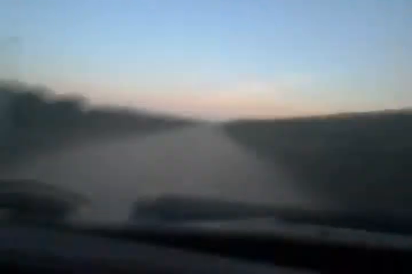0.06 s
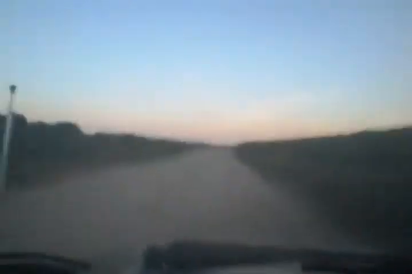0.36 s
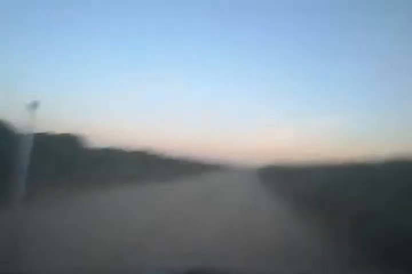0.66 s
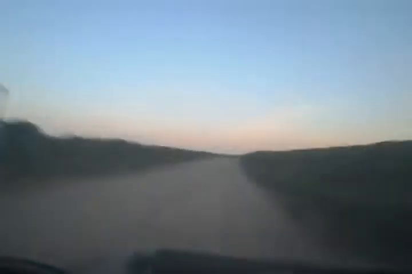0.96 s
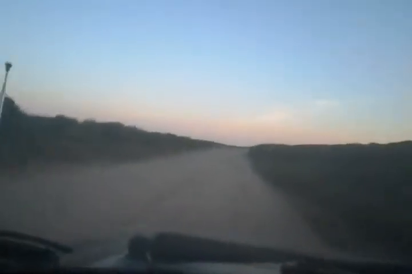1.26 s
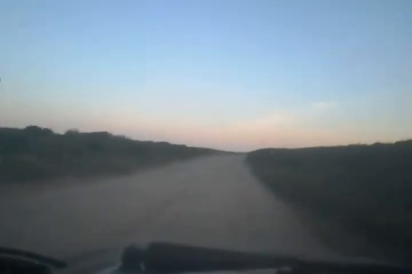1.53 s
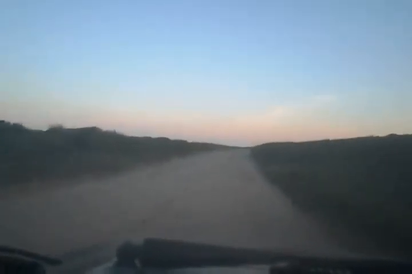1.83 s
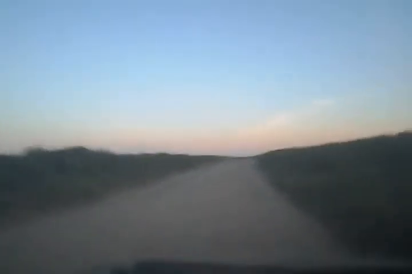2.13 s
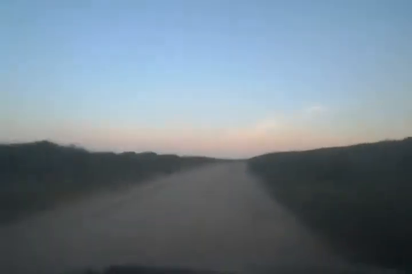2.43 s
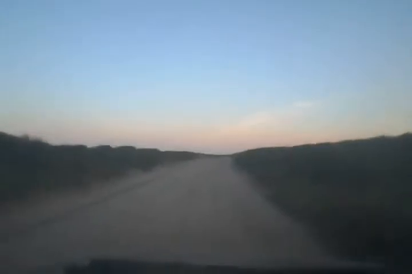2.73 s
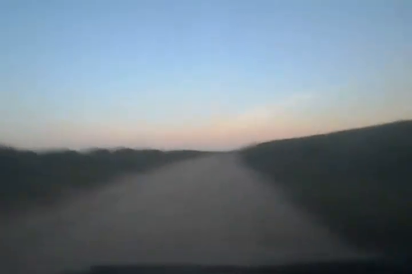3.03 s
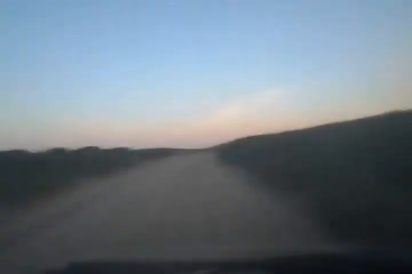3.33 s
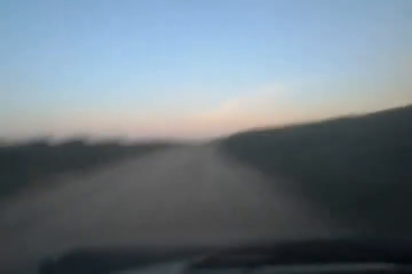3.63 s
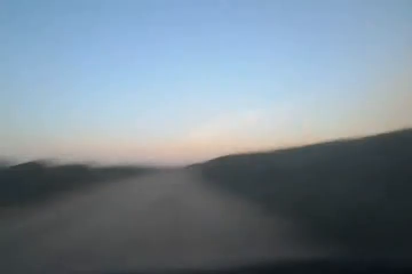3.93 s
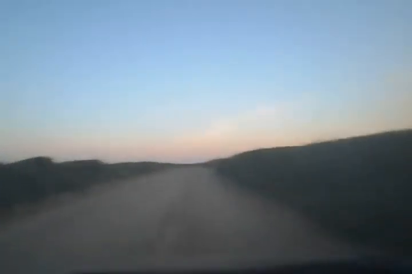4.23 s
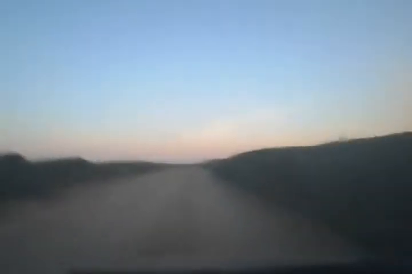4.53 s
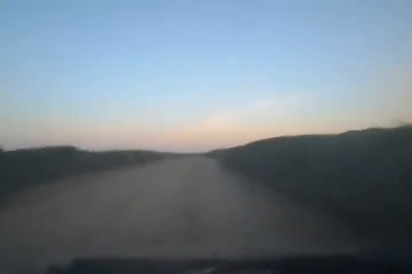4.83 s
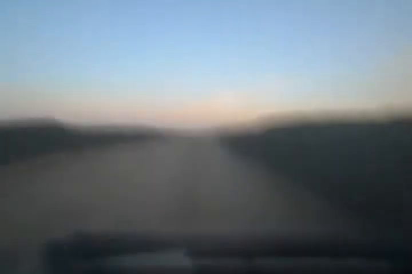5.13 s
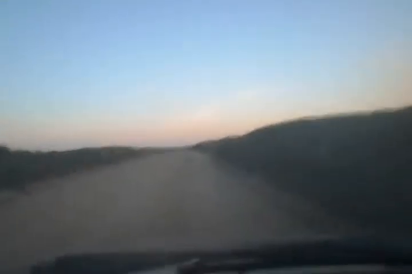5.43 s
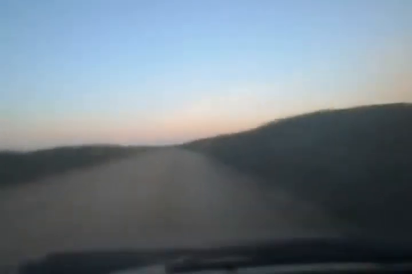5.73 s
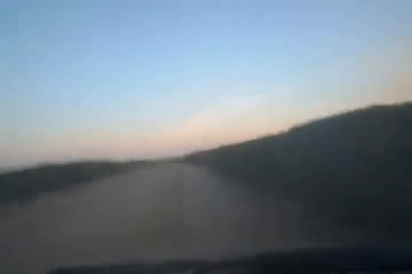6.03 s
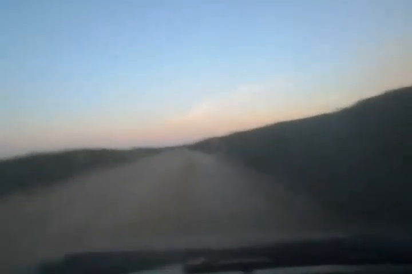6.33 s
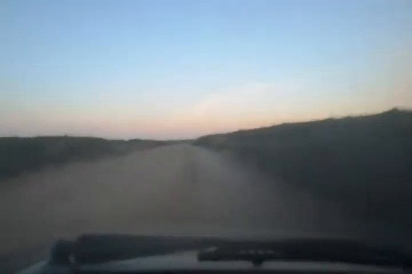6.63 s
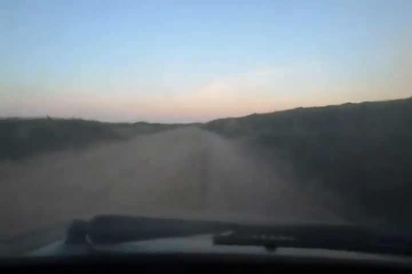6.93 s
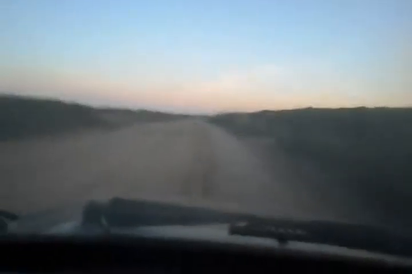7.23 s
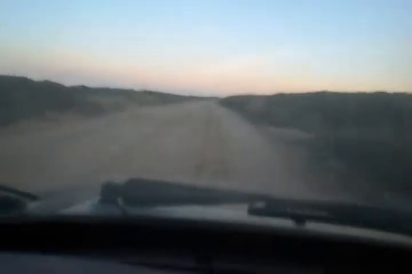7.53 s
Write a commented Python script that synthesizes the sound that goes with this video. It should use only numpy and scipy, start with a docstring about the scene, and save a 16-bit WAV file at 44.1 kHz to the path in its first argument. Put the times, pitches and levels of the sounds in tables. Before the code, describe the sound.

A car rumbles over a rough dirt road, heard from inside, with jolts, clattering trim and sand hissing under the wheels.

```python
"""A low rumble and a hiss of sand come first: we are inside a car gathering speed on a rough track.
The body heaves over the ruts, the floor drums and the tyres roar on the ground.
Patches of loose sand and gravel spray the wheel arches while small parts tick and jingle.
Jolts thump the suspension and make loose trim and panels click, clatter and squeak.
Through it all the engine's firings boom in the cabin, slowly rising in pitch."""
import sys
import numpy as np
from scipy import signal
from scipy.fft import rfft, irfft
from scipy.io import wavfile
from scipy.ndimage import uniform_filter1d, minimum_filter1d

SR = 44100
rng = np.random.default_rng(int(sys.argv[2]) if len(sys.argv) > 2 else 0)


def transcribe(signal):
    """Save signal, clipped to [-1, 1], as a 16-bit WAV file at the path in sys.argv[1]."""
    frames = np.atleast_2d(signal).T
    limited = np.clip(frames, -1, 1)
    pcm = np.round(limited * 32767).astype(np.int16)
    wavfile.write(sys.argv[1], SR, pcm)


N = 334704
T = np.arange(N) / SR

# how rough the track is: (time [s], roughness [dB])
ROUGHNESS = [(0.0, -47), (0.21, -45), (0.55, -37), (0.78, -44.5), (1.08, -49.5), (2.51, -42.5), (2.96, -44),
             (3.3, -50.5), (3.63, -43), (4.33, -48.5), (5.3, -42.5), (5.41, -43), (5.56, -42),
             (5.81, -47.5), (6.64, -43), (6.98, -46.5), (7.36, -44), (7.59, -40)]
# dips that swing the body and load the wheels: (time of deepest point [s], heave [dB], drumming [dB])
TRACK_DIPS = [(.37, -16.5, -33.5), (.68, -13.5, -36.5), (1.229, -19.5, -56), (1.38, -17, -38.5),
              (2.151, -18.5, -38.5), (2.522, -15, -34.5), (2.792, -15.5, -40), (3.05, -19, -29.5),
              (3.204, -13, -30.5), (3.559, -12, -32.5), (3.969, -15, -49), (5.341, -11, -37.5),
              (5.862, -20.5, -34.5), (6.052, -15.5, -32), (6.23, -14.5, -33.5), (6.529, -11.5, -31),
              (6.76, -11, -29), (7.38, -19.5, -31.5)]
# the tone colour of each noise: (frequency [Hz], relative level [dB])
HEAVE_SPECTRUM = [(8, -22), (15, -5), (24, 0), (34, -2.5), (46, -6.5), (62, -13), (85, -24), (130, -40)]
FLOOR_SPECTRUM = [(45, -5), (80, 2), (105, -1), (125, -3.5), (148, -5), (175, -8.5), (212, -8),
                  (245, -17.5), (320, -19), (600, -61.5)]
TYRE_SPECTRUM = [(120, -18.5), (230, -7), (280, 5.5), (340, 2.5), (430, 0.5), (540, -0.5), (680, -4),
                 (850, -8.5), (1100, -13), (1400, -17), (2200, -40), (3500, -75)]
GRAVEL_SPECTRUM = [(600, -12.5), (1100, 8.5), (1600, 13), (2300, 13.5), (2800, 5), (3400, -31.5),
                   (4500, -45)]
SAND_SPECTRUM = [(1500, -20), (3000, 7.5), (4200, 6.5), (5200, 5), (6700, 4.5), (8000, 9), (9200, 9.5),
                 (9800, 7), (10500, -9.5)]
CRUNCH_SPECTRUM = [(200, -1.5), (350, 9), (550, -2), (850, -3), (1300, -19), (2300, -25.5), (3500, -50)]
# trim rubbing: (time [s], length [s], pitch [Hz], level [dB])
TRIM_RUBS = [(2.145, 0.021, 1320, -56), (5.326, 0.031, 4060, -52), (5.428, 0.025, 1596, -42),
             (5.495, 0.018, 1620, -42.5)]
# the notes hard trim rings with: (pitch [Hz], relative level [dB], time to peak [s])
TRIM_NOTES = [(1550, -5, .0005), (2200, -1, .0004), (3250, 0, .00065), (4330, -1.5, .0006),
              (5400, -7, .0004), (6720, 0, .00058), (7280, -3, .00062), (8750, -2, .00058),
              (9380, -1, .00052)]
# loose trim tapping: (time [s], level [dB], boost of low notes [dB], boost of middle notes [dB])
TRIM_TAPS = [(.031, -48, -4, 2), (.099, -47, -12, 2), (0.128, -52, -9, 3), (.183, -45, -23, -19),
             (0.4287, -30.5, -17, -4), (0.4898, -21.5, -22, -5), (0.4942, -24.5, -9, -4.5),
             (.507, -38.5, -0.5, -1), (0.531, -36, -20, -17), (0.7876, -53, -1, -3),
             (0.8174, -38.5, -4, -3), (0.825, -48, 1, 1), (.966, -62, -7, 3), (1.0675, -34, -4, -2),
             (1.152, -58, 0, 2), (1.5534, -35.5, -18.5, -6.5), (1.561, -55, -3, 5), (3.0, -50, -6, -12),
             (3.276, -38, -8, 0.5), (3.287, -42, -6, 3), (3.436, -54, 4, 11), (3.5302, -30.5, -15, 4.5),
             (3.6232, -52, 0, -7), (3.661, -22.5, -9.5, -5.5), (4.1538, -43.5, -5, 0),
             (4.221, -57, -1.5, 1), (4.2268, -41.5, -14, -12), (4.675, -48, -11, 2.5),
             (4.7003, -55, -10, 2), (4.901, -59, 0.5, 1.5), (5.262, -38, -4, -7), (5.338, -41, 6.5, -6),
             (5.365, -50, -7, -1), (5.4036, -24.5, -16, -2), (5.4067, -25.5, -10.5, -4),
             (5.432, -43.5, 2, -2), (5.4922, -41, -4, 7.5), (5.514, -31, -13, -9), (6.947, -47.5, -9, 0),
             (7.482, -59, -6, -7), (7.543, -48, -10, -4)]
# the notes of small metal parts: (pitch [Hz], relative level [dB], time to fade by 60 dB [s])
METAL_NOTES = [(2400, -5, .04), (3280, -2, .05), (3420, -4, .05), (4090, -5, .05), (4380, -3, .05),
               (4570, -4, .05), (5300, -5, .05), (5850, -5, .05), (6800, 0, .035), (7500, 0, .04),
               (8400, -1, .04), (8800, 1, .04), (9400, 1, .04)]
# loose ground thrown at the body: (start [s], length [s], gravel flow [dB], sand flow [dB])
LOOSE_PATCHES = [(0, 0.13, -61, -56.5), (0.188, 0.16, -57, -76.5), (0.37, 0.033, -51, -51.5),
                 (0.416, 0.013, -43.5, -41), (0.44, .1, -47.5, -48), (0.604, 0.036, -48.5, -53.5),
                 (0.66, 0.027, -46, -48.5), (0.713, 0.055, -57, -57), (0.784, 0.068, -57.5, -52.5),
                 (0.875, 0.03, -62, -67), (0.979, 0.1, -63, -56.5), (1.107, 0.083, -63, -59),
                 (1.29, 0.096, -57.5, -52.5), (1.397, 0.027, -64, -93), (1.523, 0.051, -66, -60.5),
                 (1.667, 0.035, -63, -85), (1.837, 0.082, -69.5, -99), (2.51, 0.036, -61.5, -94),
                 (2.693, 0.038, -59, -74.5), (2.914, 0.19, -58, -66), (3.139, 0.16, -59.5, -61),
                 (3.266, 0.29, -61, -60.5), (3.497, 0.24, -54.5, -53), (3.768, 0.19, -62.5, -80),
                 (4.106, 0.18, -59, -59), (4.508, 0.093, -63.5, -61.5), (4.644, 0.052, -65, -60.5),
                 (4.732, 0.12, -64.5, -80), (4.865, 0.075, -59.5, -60), (4.975, 0.24, -63, -84.5),
                 (5.204, 0.1, -56.5, -56), (5.248, 0.31, -50, -50.5), (5.794, 0.053, -63.5, -91),
                 (5.938, 0.047, -63, -65), (6.076, 0.051, -64.5, -95), (6.288, 0.068, -62, -72.5),
                 (6.413, 0.065, -62, -72), (6.522, 0.12, -55, -74), (6.683, 0.087, -59.5, -96.5),
                 (6.774, 0.07, -53, -61.5), (6.888, 0.11, -61, -64.5), (7.107, 0.065, -63, -73.5),
                 (7.203, 0.088, -65, -72), (7.378, 0.11, -57, -58.5), (7.534, 0.071, -56, -52.5)]
# the bands the panels ring in: (centre [Hz], width [Hz], relative level [dB])
PANEL_BANDS = [(420, 300, -3), (830, 340, 0), (1280, 450, -2), (1750, 550, -7), (2400, 800, -10)]
# loose panels clattering: (time [s], length [s], level [dB], brightness [dB per octave])
PANEL_CLATTERS = [(.398, 0.013, -45, 0), (0.413, 0.0057, -30, -4), (0.421, .014, -43, -4),
                  (.48, 0.037, -50, 0), (.603, .012, -46, 4), (0.668, .009, -37.5, 0.5),
                  (1.325, 0.043, -57, 0), (2.544, .007, -49.5, -6), (2.708, .007, -49, -1),
                  (3.199, 0.014, -45.5, 0.5), (3.218, 0.019, -51, -1), (3.35, 0.013, -51, 0),
                  (3.591, 0.01, -47, -2), (5.174, .007, -52, -2), (5.327, 0.02, -46.5, 5),
                  (6.763, .02, -49, -7), (7.56, 0.034, -49.5, 3)]
# the notes the floor rings with: (pitch [multiple of the thud pitch], relative level [dB])
FLOOR_NOTES = [(.76, -3.5), (1, 3), (1.17, -11), (1.62, -13.5)]
# jolts of the suspension: (time [s], thud peak [dB], thud pitch [Hz], crunch peak [dB])
WHEEL_JOLTS = [(0.393, -26, 146, -24.5), (.414, -24, 275, -24.5), (0.487, -23, 160.5, -37),
               (0.596, -32, 202, -34), (0.638, -21, 216, -46), (0.664, -30, 222, -37),
               (1.331, -25, 203, -37), (1.426, -30.5, 211, -34.5), (2.543, -25.5, 159.6, -38.5),
               (2.708, -28.5, 175.5, -36.5), (3.001, -37, 186, -36.5), (3.196, -26, 650, -48),
               (3.214, -27.5, 182, -36), (3.349, -58, 202, -37.5), (3.659, -35, 163, -38.5),
               (3.93, -24, 199, -47), (4.029, -26, 198, -46), (4.067, -32.5, 220, -40),
               (4.153, -28.5, 204, -35.5), (4.751, -28, 190, -39.5), (5.174, -33, 153, -41),
               (5.208, -18.5, 116, -40), (5.248, -18.5, 148, -29.5), (5.28, -16.5, 104.3, -32),
               (5.323, -25, 181, -21), (5.423, -49, 207, -29), (6.761, -26.5, 142, -35.5),
               (7.557, -27, 200, -29)]
# engine speed: (time [s], firing rate [Hz])
ENGINE_SPEED = [(0, 48), (1.4, 50.7), (2, 53.3), (2.6, 55.6), (3.2, 58.6), (4, 61.3), (4.6, 64),
                (5.2, 66.3), (6, 69), (7.59, 71.5)]
# how hard the engine works: (time [s], level [dB])
ENGINE_LOAD = [(0, -36.5), (.6, -18), (.9, -34.5), (1.2, -36.5), (1.45, -23.5), (1.8, -22), (2.1, -16),
               (2.55, -17), (3, -27), (3.9, -25.5), (4.4, -27), (4.8, -24), (5.15, -21.5), (5.8, -26),
               (6.5, -25.5), (6.95, -31), (7.4, -27), (7.59, -28)]
# the tones of the cabin boom: (pitch [multiple of the firing rate], relative level at peak load [dB])
BOOM_TONES = [(1, 0), (2, -18), (3, -26)]
# where the wall between engine and cabin rings: (centre [Hz], filter width [Hz], relative level [dB])
WALL_BANDS = [(428.8, 70, 8), (530, 39, -1), (671, 84, -2.5)]


def undb(db):
    """Turn decibels into a gain."""
    return 10 ** (np.asarray(db) / 20)


def unit(x):
    """Scale x to an average (rms) level of 1."""
    return x / np.sqrt(np.mean(x ** 2))


def curve(table):
    """Join (time, value) points with straight lines, one value per sample."""
    return np.interp(T, *np.transpose(table))


def colour(x, spectrum):
    """Give x the tone colour of a spectrum table, at an average level of 1."""
    hz, db = np.transpose(spectrum)
    f = np.maximum(np.fft.rfftfreq(N, 1 / SR), 1)
    gain = undb(np.interp(np.log(f), np.log(hz), db))
    roll_off = np.minimum(f / hz[0], 1) ** 2 * np.minimum(hz[-1] / f, 1) ** 2
    return unit(irfft(rfft(x) * gain * roll_off, N))


def resonate(x, hz, width_hz):
    """Let x ring in one band of pitch."""
    return signal.lfilter(*signal.iirpeak(hz, hz / width_hz, fs=SR), x)


def wander(turns_per_s):
    """A random drift around zero, about 1 in size."""
    step = int(SR / turns_per_s)
    stairs = np.repeat(rng.standard_normal(N // step + 1), step)
    return unit(uniform_filter1d(stairs, step)[:N])


def steady_noise(spectrum, window_s):
    """Coloured noise with swells slower than the window evened out."""
    noise = colour(rng.standard_normal(N), spectrum)
    return noise / np.sqrt(uniform_filter1d(noise ** 2, int(window_s * SR)) + 1e-9)


def grains(per_s, spread_db):
    """Random impacts, many small and a few large."""
    out, count = np.zeros(N), int(per_s * N / SR)
    place, size, sign = rng.random((count, 3)).T
    size_db = spread_db * np.minimum(-np.log1p(-size), 5)
    out[(place * N).astype(int)] = undb(size_db) * np.sign(sign - .5)
    return out


def add(out, start_s, x):
    """Mix x into out from start_s on."""
    i = max(int(start_s * SR), 0)
    out[i:i + len(x)] += x[:max(N - i, 0)]


def rougher_db(usual_db=-46):
    """How much rougher than usual the track is at each moment."""
    return curve(ROUGHNESS) - usual_db


def dips(width_s=.063, lead_s=.2):
    """Each dip in the track gives one smooth swell of heave and of drumming."""
    heave, drum = np.zeros(N), np.zeros(N)
    swell = np.exp(-((T[:int(2 * lead_s * SR)] - lead_s) / width_s) ** 2)
    for s, heave_db, drum_db in TRACK_DIPS:
        add(heave, s - lead_s, undb(heave_db) * swell)
        add(drum, s - lead_s, undb(drum_db) * swell)
    return heave, drum


def ride(gravel_flow, heave_db=-21.5, drum_db=-35, roar_db=-48.5):
    """Uneven ground heaves the body and drums the floor; the tyres roar over countless small stones."""
    rough_db = rougher_db() + .9 * wander(10)
    swings, loads = dips()
    # the shares from rough track, loose gravel and dips add up as powers
    heave_gain = np.hypot(undb(heave_db + .68 * rough_db), swings)
    drum_gain = np.linalg.norm([undb(drum_db + rough_db), undb(16) * gravel_flow, loads], axis=0)
    roar_shares = [undb(roar_db + rough_db), undb(5) * gravel_flow, undb(-13) * loads]
    heave = steady_noise(HEAVE_SPECTRUM, window_s=.2) * heave_gain
    drum = steady_noise(FLOOR_SPECTRUM, window_s=.097) * drum_gain
    roar = colour(grains(5000, spread_db=3), TYRE_SPECTRUM) * np.linalg.norm(roar_shares, axis=0)
    return heave + drum + roar


def squeaks(wobble=.03, rough_db=3):
    """The flexing body drags one panel over another: a short, rough chirp."""
    out = np.zeros(N)
    for s, length, hz, db in TRIM_RUBS:
        n = int(length * SR)
        phase = 2 * np.pi * np.cumsum(hz * (1 + wobble * wander(900)[:n])) / SR
        loudness = np.hanning(n) ** .5 * undb(rough_db * wander(370)[:n])
        add(out, s, unit(np.sin(phase) * loudness) * undb(db))
    return out


def trim_ring(low_db, middle_db, crack_db=-24, pitch=1):
    """One tap on trim: a faint crack and a tiny ring; where it is struck decides which notes answer."""
    t = T[:SR // 50]
    hz, note_db, rise_s = np.transpose(TRIM_NOTES)[:, :, None]
    detune, size_db, phase = rng.standard_normal((3, len(TRIM_NOTES), 1))
    boost_db = np.interp(hz, [4600, 6300, 7700, 8200], [low_db, middle_db, middle_db, 0])
    swell = (t / rise_s * np.exp(1 - t / rise_s)) ** 2
    waves = np.sin(2 * np.pi * (pitch * hz * (1 + .008 * detune) * t + phase))
    crack = undb(crack_db) * swell[0] * rng.standard_normal(len(t))
    return np.sum(undb(note_db + boost_db + size_db) * swell * waves, 0) + crack


def clicks(echo_db=-29, echo_fade_s=.21):
    """Hard trim taps against its seat; a faint echo from the cabin follows each tap."""
    out, t = np.zeros(N), T[:SR // 10]
    for s, db, low_db, middle_db in TRIM_TAPS:
        ring = trim_ring(low_db, middle_db)
        cabin = rng.standard_normal(len(t)) * undb(-60 * t / echo_fade_s)
        echo = signal.fftconvolve(ring, cabin)
        add(out, s, undb(db) * ring)
        add(out, s, undb(db + echo_db) * echo * abs(ring).max() / abs(echo).max())
    return out


def chatter(parts=8, taps_per_s=22, pitch_spread=.05):
    """Small loose parts tick drily, each in its own time and at its own pitch."""
    pitches = 1 + pitch_spread * np.linspace(-1, 1, parts)
    rings = [trim_ring(low_db=-1, middle_db=-1, pitch=pitch) for pitch in pitches]
    return unit(sum(signal.oaconvolve(grains(taps_per_s, spread_db=.86), ring)[:N] for ring in rings))


def jingle(taps_per_s=170, pitch_spread=.035, spread_db=2):
    """Small metal parts are shaken at random; each tap rings one briefly, a little off its usual pitch."""
    out, t = np.zeros(N), T[:SR // 10]
    onset = 1 - np.exp(-t / .0006)
    for when, part, detune, size in rng.random((int(taps_per_s * N / SR), 4)):
        hz, db, fade_s = METAL_NOTES[int(part * len(METAL_NOTES))]
        hz *= 1 + pitch_spread * (2 * detune - 1)
        db += spread_db * min(-np.log1p(-size), 4)
        ring = np.sin(2 * np.pi * hz * t) * onset * undb(-60 * t / fade_s)
        add(out, when * N / SR, undb(db) * ring)
    return unit(out)


def patches(rise_s=.035, fade_s=.11):
    """The flow of gravel and of sand builds under the wheel, holds while a patch lasts and dies away."""
    gravel_power, sand_power, t = np.zeros(N), np.zeros(N), T[:SR * 3 // 4]
    rise = np.minimum(t / rise_s, 1) ** 2
    for s, length, gravel_db, sand_db in LOOSE_PATCHES:
        shape = rise * undb(-60 * np.maximum(t - rise_s - length, 0) / fade_s)
        add(gravel_power, s - rise_s, (undb(gravel_db) * shape) ** 2)
        add(sand_power, s - rise_s, (undb(sand_db) * shape) ** 2)
    return np.sqrt(gravel_power), np.sqrt(sand_power)


def spray(gravel_flow, sand_flow, patter_db=1.7, patter_per_s=110, hiss_onset_db=-58):
    """Gravel and sand patter unevenly on the wheel arches; the same shaking rattles small parts."""
    # a few stray stones fly even between the loose patches
    strays = undb(-84 + .37 * rougher_db() + 3 * wander(3))
    stones, dust = grains(2500, spread_db=2), grains(7000, spread_db=2.2)
    gravel = colour(stones, GRAVEL_SPECTRUM) * undb(-3.5 + patter_db * wander(patter_per_s))
    sand = colour(dust, SAND_SPECTRUM) * undb(-3 + patter_db * wander(patter_per_s))
    # a weak flow mostly jingles; ticks and hiss take over as it grows
    strength = sand_flow / np.hypot(sand_flow, undb(hiss_onset_db))
    hiss_and_ticks = strength * (strength * sand + chatter() * undb(-4))
    jingling = np.sqrt(1 - strength ** 2) * jingle() * undb(-3)
    return gravel * np.hypot(gravel_flow, strays) + (hiss_and_ticks + jingling) * sand_flow


def clatters(knock_count=16, gap_s=.0035, scatter_db=2):
    """Loose panels knock in a quick, uneven run; a softer contact sounds duller."""
    out, n = np.zeros(N), SR // 10
    bands = [signal.butter(3, [hz - width / 2, hz + width / 2], "bandpass", fs=SR, output="sos")
             for hz, width, _ in PANEL_BANDS]
    for s, length, db, bright_db in PANEL_CLATTERS:
        delay, size, sign = rng.random((3, knock_count))
        times = (np.arange(knock_count) + .9 * delay) * gap_s
        force = undb(scatter_db * (2 * size - 1)) * np.exp(-(times / length) ** 4)
        knocks = np.zeros(n)
        knocks[(times * SR).astype(int)] = np.sign(sign - .5) * force
        ring = sum(undb(band_db + bright_db * np.log2(hz)) * unit(signal.sosfilt(band, knocks))
                   for band, (hz, _, band_db) in zip(bands, PANEL_BANDS))
        add(out, s, undb(db) * unit(ring) * np.sqrt(length * SR / n))
    return out


def jolts(thud_fade_cycles=20, crunch_fade_s=.14):
    """A wheel meets a rut: the floor thuds briefly and the panels crunch against each other."""
    out, t = np.zeros(N), T[:SR // 4]
    onset = 1 - np.exp(-t / .003)
    grit = steady_noise(CRUNCH_SPECTRUM, window_s=.008)
    for s, thud_db, hz, crunch_db in WHEEL_JOLTS:
        phases = 2 * np.pi * rng.random(len(FLOOR_NOTES))
        ring = sum(undb(db) * np.sin(2 * np.pi * multiple * hz * t + phase)
                   for (multiple, db), phase in zip(FLOOR_NOTES, phases))
        thud = ring * onset * undb(-60 * t * hz / thud_fade_cycles)
        crunch = np.roll(grit, -int(s * SR))[:len(t)] * onset * undb(-60 * t / crunch_fade_s)
        add(out, s, undb(thud_db) * thud / abs(thud).max())
        add(out, s, undb(crunch_db) * crunch / abs(crunch).max())
    return out


def engine(waver_db=1, rasp_db=-32, puff_cycles=.54):
    """The firings slowly speed up; uneven burning makes each tone waver, and each firing rasps."""
    firing_hz, load_db = curve(ENGINE_SPEED), curve(ENGINE_LOAD)
    cycles = np.cumsum(firing_hz * (1 + .0012 * wander(12))) / SR
    # the higher tones fade faster than the lowest as the load drops
    slack_db = .4 * (load_db - load_db.max())
    boom = np.zeros(N)
    for multiple, db in BOOM_TONES:
        gain = undb(db + (multiple > 1) * slack_db + waver_db * wander(9.1))
        boom += gain * np.sin(2 * np.pi * (multiple * cycles + rng.random()))
    puffs = rng.standard_normal(N) * np.exp(-(cycles % 1) / puff_cycles)
    rasp = sum(undb(db) * resonate(resonate(puffs, hz, width), hz, width) for hz, width, db in WALL_BANDS)
    return (unit(boom) + undb(rasp_db) * unit(rasp)) * undb(load_db)


def scene():
    """Everything as heard at the windscreen, in one channel."""
    gravel_flow, sand_flow = patches()
    driving = engine() + ride(gravel_flow) + spray(gravel_flow, sand_flow)
    return (driving + clicks() + jolts() + clatters() + squeaks())[None]


def record(dry, ceiling=.43, top_hz=9950):
    """A limiter turns down the biggest swings, and the highest treble is cut."""
    window = SR // 100
    needed_gain = ceiling / np.maximum(abs(dry), ceiling)
    smooth_gain = uniform_filter1d(minimum_filter1d(needed_gain, window), window)
    end_fades = np.minimum(np.minimum(T, T[-1] - T) / .003, 1)
    treble_cut = signal.ellip(10, .2, 70, top_hz, fs=SR, output="sos")
    return signal.sosfilt(treble_cut, dry * smooth_gain * end_fades)


dry = scene()
out = record(dry)
transcribe(out)
```